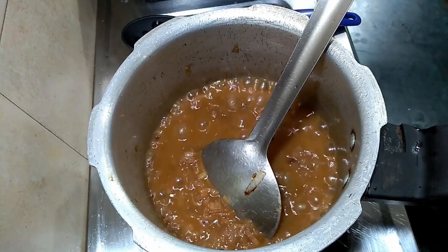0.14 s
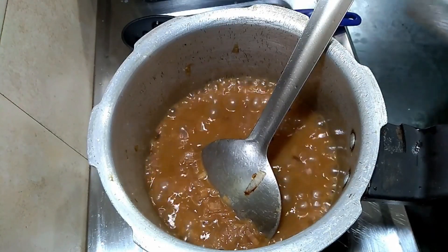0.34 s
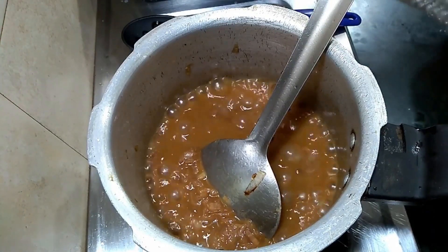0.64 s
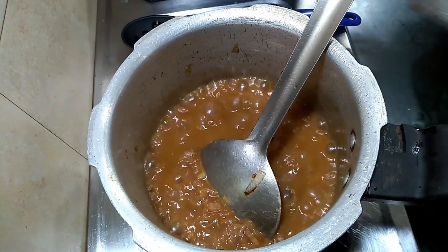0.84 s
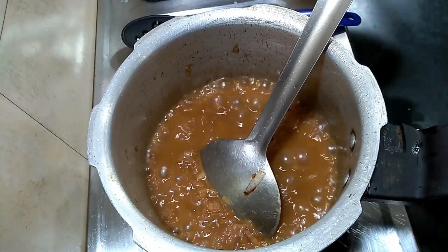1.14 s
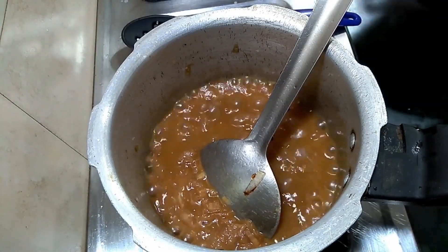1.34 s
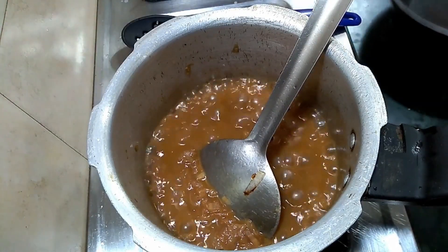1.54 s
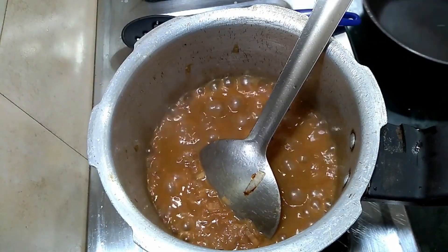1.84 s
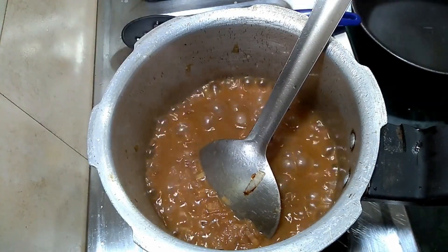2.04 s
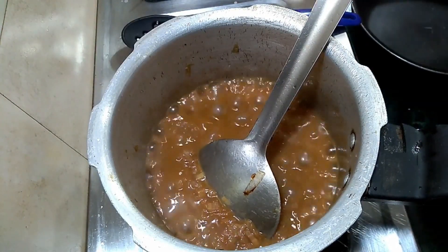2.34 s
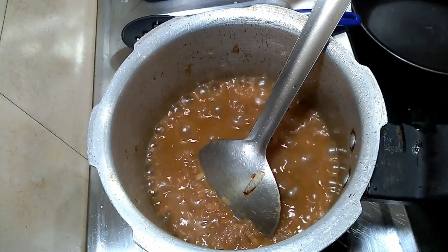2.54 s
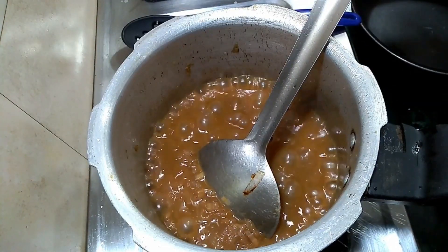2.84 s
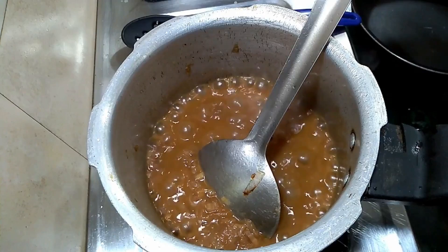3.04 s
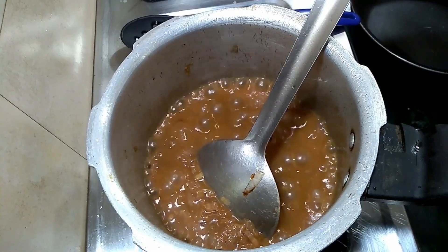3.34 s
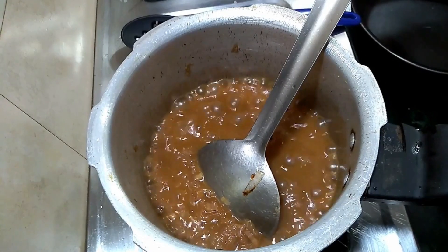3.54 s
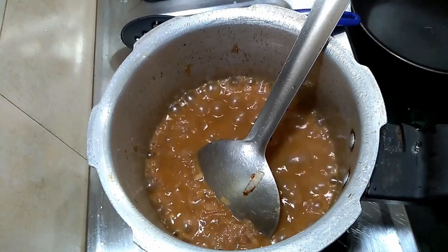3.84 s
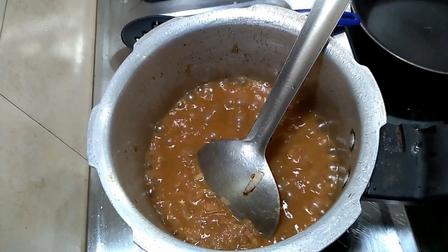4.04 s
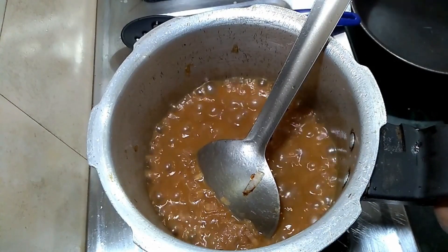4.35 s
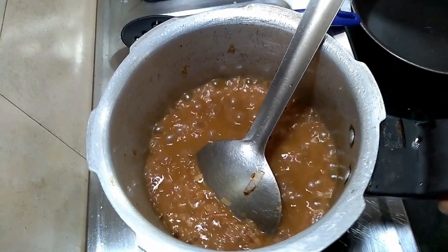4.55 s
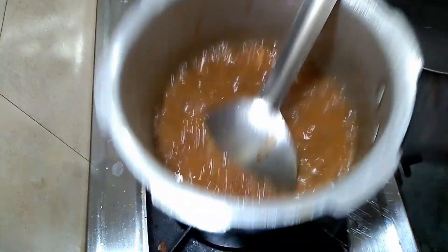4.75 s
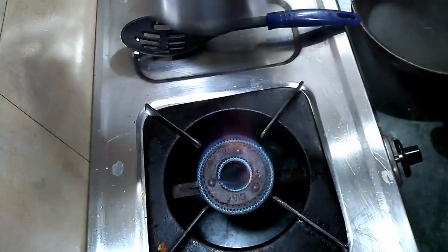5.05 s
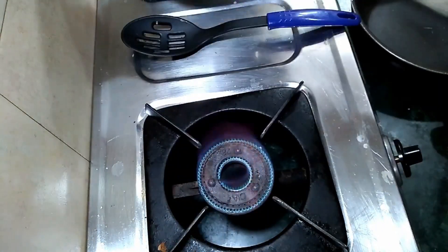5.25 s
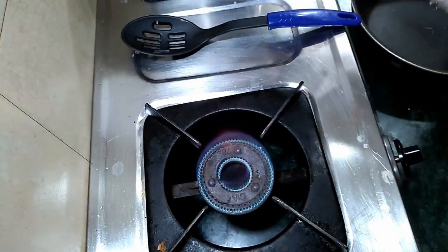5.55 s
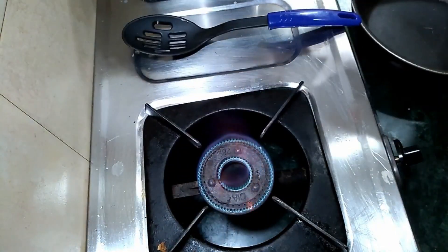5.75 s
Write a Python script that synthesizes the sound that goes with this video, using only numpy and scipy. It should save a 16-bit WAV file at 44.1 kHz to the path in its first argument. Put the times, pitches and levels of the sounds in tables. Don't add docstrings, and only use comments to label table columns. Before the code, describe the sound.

Close to a phone in a small hard-walled kitchen, thin sauce boils vigorously in an open metal pot: dense bright snapping, hollow bubbling and sharp pops. A pan scrapes, then drops with a very loud ringing clank; bowl, spoon and tongs clack softly later. Strong pops come past four seconds, then the pot is lifted, its boil fading quickly, and set down in a run of rattling metallic clanks.

```python
import sys
import numpy as np
from scipy import signal
from scipy.io import wavfile
from scipy.ndimage import uniform_filter1d

SR = 44100
rng = np.random.default_rng(int(sys.argv[2]) if len(sys.argv) > 2 else 0)


def to_wav(s):
    ch = np.atleast_2d(s).T
    pcm = np.round(np.clip(ch, -1, 1) * 32767)
    wavfile.write(sys.argv[1], SR, pcm.astype(np.int16))


def volts_from_db(level):
    exponent = np.asarray(level, float) / 20
    return 10 ** exponent


N = 259528

# time_s, distance_m to the phone
CARRY = [
    (4.84, 0.32),
    (4.9, 0.41),
    (4.98, 0.58),
    (5.25, 0.64),
    (5.45, 1.95),
    (5.88, 0.47),
]


def rms_one(x):
    return x / np.sqrt(np.mean(x ** 2) + 1e-20)


def in_time(rows):
    s, *columns = np.transpose(rows)
    return [np.interp(np.arange(N) / SR, s, c) for c in columns]


def drift(rate):
    r = np.exp(-80 * np.pi * rate / SR)
    white = rng.standard_normal(N // 40 + 2002)
    slow = signal.lfilter([1], [1, -2 * r, r * r], white)[2000:]
    return np.interp(np.arange(N) / 40, np.arange(len(slow)), rms_one(slow))


def swells(rows):
    t = np.arange(N) / SR
    return sum(db * np.exp(-((t - s) / half_s) ** 2) for s, half_s, db in rows)


def band(x, low_hz, high_hz):
    return signal.sosfilt(signal.butter(2, [low_hz, high_hz], "band", fs=SR, output="sos"), x)


def low_pass(x, hz):
    return signal.sosfilt(signal.butter(6, hz, fs=SR, output="sos"), x)


def resonance(x, hz, width):
    r = np.exp(-np.pi * max(width, 2) / SR)
    poles = [1, -2 * r * np.cos(2 * np.pi * hz / SR), r * r]
    return signal.lfilter(np.array([1, 0, -1]) * (1 - r * r) / 2, poles, x)


def grains(per_s, spread_db, clump_db):
    sizes = volts_from_db(spread_db * np.minimum(rng.exponential(1, N), 4)) * rng.choice([-1, 1], N)
    return sizes * (rng.random(N) < per_s * volts_from_db(clump_db * drift(20)) / SR) + 1e-18


def coloured(draw, spectrum, step, patchy_db, rate):
    hz, level_db = np.transpose(spectrum)
    edges = hz[0] * 2 ** np.arange(0, np.log2(hz[-1] / hz[0]), step)
    out = 0
    for k, (low, high) in enumerate(zip(edges, edges[1:])):
        gain_db = np.interp(np.log(low * high) / 2, np.log(hz), level_db)
        out = out + volts_from_db(gain_db + patchy_db * drift(rate)) * band(draw[k % len(draw)], low, high)
    return rms_one(out)


def struck(rows, rise_s):
    out = np.zeros(N)
    for s, peak_db, hz, t60 in rows:
        i = round(s * SR)
        t = np.arange(min(N - i, int(t60 * SR) + 9)) / SR
        envelope = volts_from_db(peak_db - 60 * t / t60) * (1 - np.exp(-t / rise_s))
        out[i:i + len(t)] += envelope * np.sin(2 * np.pi * hz * t)
    return out


def layer_levels():
    # time_s, level_db about its mean
    vigour = [(0, 1), (.3, -1.5), (.57, 0), (1.0, 0.5), (1.4, 0), (1.8, 0), (2.0, 1), (2.3, -2.5),
              (2.55, 0.5), (2.8, -1), (3.2, 0), (3.4, -0.5), (3.8, 0), (4.0, -0.5), (4.2, 1.5), (4.4, 0),
              (4.65, 3), (4.85, 0)]
    # level_db, share of the vigour, share of the distance loss
    layers = [(-31, 0.82, 1.1), (-38.5, 1.14, 2.07), (-36, 0.28, 0.99), (-73.5, 1.5, 0.78)]
    vigour_db, = in_time(vigour)
    metres, = in_time(CARRY)
    loss_db = 20 * np.log10(metres / metres[0])
    return [db + share * vigour_db - far * loss_db for db, share, far in layers]


def sizzle(bright_db, body_db, top_db):
    # freq_hz, level_db per Hz
    body_spectrum = [(1470, -49), (2500, 19.5), (2820, -3), (3020, 5), (3700, -4.5), (4120, 36),
                     (4410, 8.5), (5020, -26), (5410, 10.5), (7000, 15), (9100, -52), (15400, -120)]
    # freq_hz, width_hz, level_db
    snap_bands = [(6940, 1400, -2), (7800, 980, 0), (8730, 250, 4.5), (9500, 1080, 3), (10250, 700, -3.5)]
    # centre_s, half_length_s, rise_db
    steam_surges = [
        (3.62, .05, 9),
        (3.88, .03, 7),
        (4.17, 0.12, 13),
        (4.74, 0.12, 21.5),
    ]
    top_spectrum = [(11000, 5), (12200, 1.5), (13000, -3.5), (16200, -7)]  # freq_hz, level_db

    metres, = in_time(CARRY)
    crisp = (metres[0] / metres) ** 0.69
    snaps = rms_one(grains(per_s=1300, spread_db=3.8, clump_db=3))
    spray = rng.standard_normal((2, N))
    draw = crisp * snaps + np.sqrt(volts_from_db(-18.5) + 1 - np.minimum(crisp, 1) ** 2) * spray
    body = low_pass(coloured(draw, body_spectrum, 1 / 4, patchy_db=3.0, rate=130), 7100)
    bright = 0
    for k, (hz, width, db) in enumerate(snap_bands):
        bright = bright + volts_from_db(db + drift(66)) * band(draw[k % 2], hz - width / 2, hz + width / 2)
    bright = low_pass(bright, 11200)
    mist = spray + volts_from_db(-4) * crisp * snaps
    top = coloured(mist, top_spectrum, 1 / 12, patchy_db=4.5, rate=30)
    top_db = top_db + swells(steam_surges)
    return volts_from_db(bright_db) * rms_one(bright) + volts_from_db(top_db + 16.0) * top + volts_from_db(body_db + 3.0) * rms_one(body)


def standing_waves(modes):
    out = 0
    for hz, width, db in modes:
        bursts = rms_one(grains(per_s=150, spread_db=2.5, clump_db=3.5)) + volts_from_db(-1.0) * rng.standard_normal(N)
        ringing = resonance(resonance(bursts, hz, 3.4 * width), hz, 0.85 * width)
        out = out + volts_from_db(db + 2.0 * drift(1.96)) * rms_one(ringing)
    return rms_one(out)


def air_column(wave_db, body_db):
    # freq_hz, width_hz, level_db
    main_wave = [(1590, 566, 0)]
    # freq_hz, width_hz, level_db
    other_waves = [(900, 715, 18.5), (1090, 200, 4), (2446, 230, 10), (3434, 110, 2), (4164, 290, 8),
                   (4930, 1140, 15)]
    main = volts_from_db(wave_db) * band(standing_waves(main_wave), 1190, 1977)
    return main + volts_from_db(body_db + 3.5) * standing_waves(other_waves)


def pops():
    # start_s, peak_db, pitch_hz
    large_pops = [(.1453, -4, 9300), (.2197, -4, 9300), (.247, -3.5, 9300), (.3252, 9, 8300),
                  (.5195, -14.5, 6340), (.631, -2.5, 8850), (.7272, -4, 8300), (1.074, -7, 9300),
                  (1.1396, -8, 7800), (1.2146, -1.5, 8550), (1.369, -3.5, 7800), (1.6731, 2.5, 10000),
                  (2.0104, -8, 9300), (2.517, -8, 9800), (2.7886, -7, 8400), (2.9316, -5.5, 8500),
                  (3.1937, 0, 8700), (3.316, -5, 9500), (3.3568, -3, 9100), (3.6109, -8, 5450),
                  (3.6447, -8, 8000), (3.8137, -6.5, 9500), (3.9828, -10.5, 8250), (4.0711, -0.5, 9000),
                  (4.0941, -14, 9370), (4.1094, 17, 10100), (4.1447, 25, 9300), (4.173, 4, 8000),
                  (4.364, -0.5, 10000), (4.7116, 2, 10400)]
    # start_s, peak_db, pitch_hz
    lesser_pops = [(0.1679, -17.5, 7620), (0.2525, -25, 9340), (0.314, -11, 8280), (0.3621, -15, 9620),
                   (0.377, -21.5, 5770), (0.391, -13, 8590), (0.4574, -13, 8380), (1.0864, -23, 8600),
                   (1.1164, -23, 9930), (1.254, -13, 9090), (1.304, -20, 8200), (1.3452, -23, 9390),
                   (1.415, -22, 8590), (1.514, -20.5, 5070), (1.5264, -13, 7180), (1.882, -16, 8610),
                   (1.9853, -20.5, 5250), (2.0895, -25, 8500), (2.1359, -33, 8040), (2.157, -23, 8220),
                   (2.3165, -27, 8610), (2.422, -13.5, 8660), (2.988, -22.5, 4150), (3.438, -32, 8130),
                   (3.469, -19, 9360), (3.5183, -11, 8570), (3.5817, -26, 7130), (3.651, -9.5, 8060),
                   (3.705, -9, 8600), (3.7484, -12.5, 8610), (3.873, -14, 9020), (3.8799, -7, 9080),
                   (3.9259, -21, 10200), (3.9436, -17, 8530), (3.95, -16, 8230), (4.2848, -9, 9610),
                   (4.348, -17, 9470), (4.3776, -22.5, 3980), (4.4796, -31, 8610), (4.557, -17, 4240),
                   (4.5764, -7, 9100), (4.6364, -15, 9210), (4.76, -14.5, 9050), (4.791, -7.5, 9840)]

    count = int(60 * 4.8)
    when, size = rng.random(count), rng.standard_normal((count, 2))
    small_hz = np.minimum(8300 * 2 ** (-0.35 * size[:, 1]), 11000)
    small_db = -22 + 2.5 * np.minimum(size[:, 0], 1.3)
    small = np.c_[when * CARRY[0][0], small_db, small_hz]

    listed = np.array([*large_pops, *(np.array(lesser_pops) + [0, 8, 0])])
    drops = []
    for (s, db, hz), row in zip(listed, rng.random((len(listed), 3, 3))):
        for late, weak, low in row:
            drops.append((s + 0.0051 * late, min(db, -4) - 9 - 6 * weak, hz * (1.1 - .6 * low)))
    direct = struck([(s, db + 4, hz, 10 / hz) for s, db, hz in [*listed, *drops, *small]], rise_s=.0001)

    t = np.arange(int(.02 * SR)) / SR
    wall = band(rng.standard_normal(len(t)), 4000, 11000) * volts_from_db(-25 - 2500 * t)
    return low_pass(direct + signal.fftconvolve(direct, wall)[:N], 11200)


def blips():
    # start_s, peak_db, pitch_hz
    pockets = [(0.222, -20.5, 1550), (0.609, -35, 1690), (1.07, -24, 1710), (1.2779, -19, 2470),
               (1.414, -22, 1610), (1.928, -29, 1740), (2.1102, -24, 1610), (2.175, -24.5, 1096),
               (2.2255, -24, 1630), (2.316, -31, 1590), (2.369, -25, 1640), (2.744, -23, 1520),
               (2.8932, -26, 1570), (3.1536, -23, 1610), (3.641, -24, 1580), (4.5416, -23.5, 1610),
               (4.5922, -19, 1710), (4.764, -21.5, 1540), (5.1816, -36, 1456), (5.2897, -26, 1477)]
    # start_s, peak_db, pitch_hz
    gulp = (1.428, -21, 1200)
    chance = rng.random((70, 3))
    stray = np.c_[chance[:, 0] * CARRY[0][0], -35 + 7 * chance[:, 1], 700 * 3 ** chance[:, 2]]
    out = np.zeros(N)
    for rows, cycles, rise in ((pockets, 48, .08), ([*stray, gulp], 30, .25)):
        for s, db, hz in rows:
            i, t60 = round(s * SR), cycles / hz
            t = np.arange(int(t60 * SR)) / SR
            phase = 2 * np.pi * hz * (t - rise * t / 4 + rise * t ** 2 / t60)
            envelope = volts_from_db(db + 3.5 - 60 * t / t60) * (1 - np.exp(-t / 0.0017))
            out[i:i + len(t)] += envelope * np.sin(phase)
    return out


def band_bursts():
    # start_s, rms_db, centre_hz, width_hz, t60_s
    puffs = [(5.045, -31, 8000, 2520, 0.25), (5.079, -36, 4200, 2200, 0.36), (5.098, -34, 9300, 1760, 0.71),
             (5.148, -39.5, 4000, 2400, 0.67), (5.173, -30, 7800, 3040, 0.29),
             (5.325, -38.5, 4990, 900, 0.28), (5.324, -34, 8440, 1490, 0.17), (4.72, -39, 3430, 159, 0.46),
             (4.87, -44.5, 3390, 160, .4), (4.9, -49, 4130, 151, .4), (5.021, -46.5, 2750, 130, 0.48),
             (5.16, -47, 2730, 150, .3), (5.272, -40.5, 1170, 300, .6), (5.335, -48, 3680, 100, .2),
             (5.378, -48.5, 2340, 90, 0.45), (5.4, -49, 2900, 90, .15), (5.625, -30, 1700, 1300, .3),
             (5.63, -33, 6700, 3600, .25), (5.745, -33, 6500, 4000, .2), (5.815, -33, 8800, 1800, .05)]
    out = np.zeros(N)
    for s, db, hz, width, t60 in puffs:
        i = round(s * SR)
        t = np.arange(min(N - i, int(t60 * SR))) / SR
        puff = rms_one(band(rng.standard_normal(SR)[:len(t)], hz - width / 2, hz + width / 2))
        out[i:i + len(t)] += volts_from_db(db - 60 * t / t60) * puff
    return out


def knocks(rows, body, crack_db, upper_db, upper_share, top_db):
    # low_hz, high_hz
    edges_hz = [(5000, 11500), (140, 600), (600, 2000), (2000, 5000), (11500, 15600)]
    rises = [0.000065, 0.0014, 0.0008, 0.00099, 0.00043]
    out = np.zeros(N)
    near = slice(int(rows[0][0] * SR) - 2000, int((rows[-1][0] + 1) * SR))
    for k, (low, high) in enumerate(edges_hz):
        power = np.zeros(N)
        for s, db, hard_db, weight_db, t60 in rows:
            tilt_db = [hard_db, weight_db, 0, upper_db + upper_share * hard_db, top_db + hard_db][k]
            i, t60 = round(s * SR), max(t60, .02)
            t = np.arange(min(N - i, int(1.2 * t60 * SR))) / SR
            shape = (volts_from_db(-60 * t / t60) + volts_from_db(crack_db - 19000 * t)) * (1 - np.exp(-t / rises[k]))
            power[i:i + len(t)] += (volts_from_db(db + tilt_db - 6.5) * shape) ** 2
        noise = low_pass(band(rng.standard_normal(N)[near], low, high), high)
        out[near] += np.sqrt(power[near]) * rms_one(noise)
    out += 1e-18
    return out + sum(volts_from_db(db) * resonance(out, hz, width) for hz, width, db in body)


def pan():
    # start_s, strength_db, hardness_db, weight_db, t60_s
    slide_knocks = [
        (.7553, -29.5, 6, 0, 0.075),
        (.8092, -16.5, -6.5, -11.5, 0.24),
        (.8607, -21.5, -5, -21, 0.35),
        (.8824, -24, 9.5, -18, 0.18),
        (.904, -31, -13, -4, .084),
        (.93, -17, -6.5, -10.5, 0.32),
        (.9474, -21.5, -9, 2, 0.16),
        (.9675, -31, 13, -8, 0.045),
    ]
    drop_knocks = [
        (1.5853, 5.5, -6.5, -7.5, 0.19),
        (1.6094, -33, -15, 13, 0.3),
        (1.6444, -2.5, -28, 0.5, 0.058),
        (1.6638, -35, 7.5, 11.5, 0.41),
    ]
    # freq_hz, width_hz, level_db
    sliding_modes = [(358, 130, 14.5), (827, 22, 17), (915, 49, 7.8), (1300, 15, 13), (1460, 14, 2.1),
                     (1920, 48, 1.8), (2350, 48, 9.6), (3010, 17, 1.8), (3610, 23, 3.7)]
    dropped_modes = [(572, 30, 4), (740, 40, 8), (760, 16, 15), (1141, 30, 7), (1240, 30, 3), (1467, 25, 8),
                     (2400, 60, 5), (2950, 50, 4), (3575, 40, 3), (5190, 60, 4), (5998, 40, 6),
                     (6340, 30, 8), (8452, 60, 4)]
    slide = knocks(slide_knocks, sliding_modes, crack_db=-32, upper_db=0.5, upper_share=0.66, top_db=-38)
    drop = knocks(drop_knocks, dropped_modes, crack_db=-6, upper_db=-2.5, upper_share=1.0, top_db=-24)
    return slide + drop


def pot_and_tongs():
    # start_s, strength_db, hardness_db, weight_db, t60_s
    pot_knocks = [
        (5.4709, -12.5, 6, -7.5, 0.21),
        (5.4824, -6.5, 0.8, -2.5, 0.16),
        (5.5162, -9.5, 3.5, 3, 0.18),
        (5.549, -14, -4, -1.5, 0.25),
        (5.5874, -17.5, -2, -2, 0.19),
        (5.6, -29.5, 6, -15, 0.44),
        (5.63, -34, 5.5, -13, 0.4),
        (5.693, -19.5, -12, -0.5, 0.15),
        (5.73, -17, 4, -2, 0.15),
        (5.7945, -24, 0.5, -7, 0.22),
    ]
    tongs_knocks = [
        (3.0312, -16, 13.5, 6, 0.065),
        (3.0426, -19, 2.7, 0.92, 0.25),
    ]
    # freq_hz, width_hz, level_db
    pot_modes = [(294, 30, 9), (386, 30, 6), (495, 35, 4), (820, 45, 7), (2700, 300, 1), (3465, 50, 6),
                 (3595, 50, 5), (3796, 60, 5), (4274, 60, 3), (7887, 140, 2), (8716, 120, 3), (9500, 80, 5)]
    tongs_modes = [(796, 150, 3), (1150, 53, 5), (1300, 49, 4.2), (3830, 420, 5), (9500, 3700, 9.9),
                   (13330, 53, 5.8)]
    landing = knocks(pot_knocks, pot_modes, crack_db=-14.0, upper_db=0.4, upper_share=0.11, top_db=-17.0)
    clack = knocks(tongs_knocks, tongs_modes, crack_db=-21.0, upper_db=-3, upper_share=0.94, top_db=-0.7)
    return landing + clack


def spoon_and_bowl():
    # start_s, strength_db,
    # hardness_db, weight_db, t60_s
    spoon_knocks = [
        (.516, -46.5, 22, -3, 0.21),
        (2.516, -41, 12, -11, 0.13),
        (3.814, -42, 17, -9, 0.078),
        (4.011, -23, -2.5, 1.5, 0.14),
        (4.0958, -13.5, -2, -5.5, 0.1),
        (4.1262, -17, 9, 2, 0.25),
    ]
    bowl_knocks = [(1.7474, -37, -22, 3, 0.38), (1.8028, -23.5, -16, -1.5, 0.084),
                   (2.4153, -52, 13.5, 15, 0.4), (2.4594, -42, -36, 8, 0.32), (2.5794, -23, 4.5, -4, 0.11),
                   (2.6065, -21, 4, 6.5, 0.12), (2.63, -35, 12.5, 8.5, 0.3), (3.1931, -39, 14, 8, 0.13),
                   (3.2214, -28, 1, -1.5, 0.11), (3.2506, -31.5, 3.5, 7.5, 0.2),
                   (3.9833, -25.5, 2, -0.5, 0.051), (4.3835, -41.5, 7, 17, 0.13),
                   (4.4984, -21.5, -13, 0, 0.059), (4.5194, -42.5, 6, 13.5, 0.22)]
    # freq_hz, width_hz, level_db
    spoon_modes = [(2200, 110, 1.7), (5570, 370, 1.7), (9300, 1900, 5.9)]
    bowl_modes = [(230, 150, 1), (339, 99, 6.2), (513, 73, 11.3), (720, 46, 19.5), (830, 9.8, 1),
                  (2060, 59, 8.7)]
    spoon = knocks(spoon_knocks, spoon_modes, crack_db=10.5, upper_db=0.0, upper_share=0.69, top_db=-9.5)
    bowl = knocks(bowl_knocks, bowl_modes, crack_db=-12, upper_db=-2, upper_share=1.0, top_db=-43)
    return spoon + bowl


def low_rings():
    # start_s, peak_db, pitch_hz, t60_s
    clean_rings = [(.752, -20, 843, 0.42), (1.589, -1, 1460, 0.072), (1.586, 1, 2340, 0.093),
                   (1.591, -4.5, 1125, 0.18), (1.803, -30, 696, 0.086), (1.803, -17.5, 1664, 0.032),
                   (5.482, -13, 819, 0.38), (5.517, -9.5, 294.7, 0.28), (5.517, -14.5, 389, 0.19),
                   (5.517, -6, 775, 0.13), (5.52, -16, 3593, 0.28), (5.52, -14.5, 3798, 0.25),
                   (5.59, -16.5, 504, 0.18),
                   (1.586, 9, 760, .24),
    ]
    return struck(clean_rings, rise_s=0.001)


def rattling_rings():
    # start_s, peak_db, pitch_hz, t60_s
    upper_modes = [(1.586, -8, 6347, 0.23), (1.602, -22, 6347, 0.22), (1.586, -8, 7830, .04),
                   (1.604, -17, 8463, .15), (1.612, -13, 5290, 0.16), (1.622, -12.5, 5160, 0.063),
                   (1.6, -20, 3970, 0.21), (1.588, 0, 565, 0.14), (1.63, -22, 2350, 0.21),
                   (5.4715, -12, 2990, 0.035), (5.4715, -12.5, 4260, 0.034), (5.4873, -9.5, 3730, 0.088),
                   (5.59, -26.5, 9360, 0.13), (5.597, -18, 3800, 0.095), (5.6938, -22.5, 4690, 0.053),
                   (5.7292, -14, 9400, .04), (5.7292, -16, 3800, .1), (5.7956, -31, 2900, 0.1),
                   (5.7956, -27.5, 5640, 0.07)]
    pan_rebound = [(1.641, 14, 760, .065)]  # start_s, peak_db, pitch_hz, t60_s
    rings = struck(upper_modes, rise_s=.0005) + struck(pan_rebound, rise_s=.012)
    return rings * volts_from_db(3 * drift(120))


def counter():
    # start_s, peak_db, t60_s
    thuds = [
        (0.951, -62, 0.64),
        (1.599, -22.5, 0.65),
        (2.619, -32, 0.62),
        (3.052, -32, 0.79),
        (3.217, -19, 0.61),
        (3.252, -34, 0.54),
        (5.479, -36, 0.25),
        (5.597, -34, 0.52),
    ]
    # start_s, peak_db, pitch_hz, t60_s
    taps = [
        (1.424, -23, 905, 0.069),
        (1.971, -22.5, 162, 0.087),
        (1.999, -23.5, 144, 0.19),
        (2.459, -29, 496, 0.11),
        (3.109, -22, 155, 0.089),
        (3.224, -15, 203, 0.071),
        (3.255, -19.5, 220, 0.06),
        (4.726, -24, 152, 0.075),
        (5.117, -26.5, 760, 0.19),
        (5.194, -15.5, 714, 0.037),
    ]
    # start_s, peak_db, pitch_hz, t60_s
    jolts = [
        (1.587, -7, 34, 0.055),
        (3.031, -38, 44.7, 0.11),
        (5.476, -33, 40, 0.17),
    ]
    booms = struck([(s, db, 97.9, t60) for s, db, t60 in thuds], rise_s=0.0059)
    return booms + struck(taps + jolts, rise_s=0.001)


def churn():
    # freq_hz, level_db per Hz
    rumble_spectrum = [(15, -76.5), (25, -40), (59, -25.5), (81, -18), (135, -6.5), (179, -30), (198, -22),
                       (416, -12), (656, -13.5), (874, -9), (950, -8.5), (1400, -4.5), (1820, -15),
                       (3080, -120)]
    # centre_s, half_length_s, rise_db
    shakes = [
        (.87, 0.13, 4),
        (1.74, 0.13, 7),
        (2.1, 0.12, 1),
        (3.1, 0.28, 3.5),
        (4.5, 0.26, 3.5),
        (5.65, 0.1, 6),
    ]
    rumble = coloured(rng.standard_normal((2, N)), rumble_spectrum, 1 / 2, patchy_db=3.0, rate=18.3)
    return low_pass(low_pass(rumble, 892), 892) * volts_from_db(-31 + swells(shakes))


def thin_tones():
    # freq_hz, width_hz, rms_db
    whistles = [(1484, 180, -45.5), (1640, 20, -51.5), (2466, 100, -56), (2660, 260, -63), (4200, 50, -69),
                (5370, 90, -89), (8000, 83, -53.5)]
    white = rng.standard_normal(N)
    out = 0
    for hz, width, db in whistles:
        out = out + volts_from_db(db + 3 * drift(6.5)) * rms_one(resonance(resonance(white, hz, width), hz, width))
    return out


def room(x):
    level_db, t60_s = -21, 0.35
    t = np.arange(int(.5 * SR)) / SR
    tail = band(rng.standard_normal(len(t)), 710, 8000) * volts_from_db(-60 * t / t60_s) * (t > .008)
    return x + volts_from_db(level_db) * signal.fftconvolve(x, tail / np.sqrt(np.sum(tail ** 2)))[:N]


def scene():
    bright_db, body_db, wave_db, top_db = layer_levels()
    boil = sizzle(bright_db, body_db, top_db) + air_column(wave_db, body_db) + pops() + blips() + band_bursts()
    cookware = room(pan() + pot_and_tongs() + rattling_rings()) + spoon_and_bowl() + low_rings()
    return (boil + cookware + counter() + churn() + thin_tones())[None]


def denoise(x, depth_db, strength):
    hz, _, spec = signal.stft(x, SR, nperseg=1024, noverlap=768)
    power = uniform_filter1d(np.abs(spec) ** 2, size=7, axis=-1)
    power = uniform_filter1d(power, size=2, axis=-2) + 1e-20
    steady = uniform_filter1d(np.median(power, axis=-1, keepdims=True), size=15, axis=-2)
    steady = steady * np.interp(hz, [500, 1200, 11000, 12000], [0, 1, 1, .6])[:, None]
    gain = np.sqrt(np.clip(1 - strength * steady / power, volts_from_db(2 * depth_db), 1))
    return signal.istft(spec * gain, nperseg=1024, noverlap=768)[1][..., :N]


def top_cut(x):
    return signal.sosfilt(signal.butter(12, 15650, fs=SR, output="sos"), x)


def record(dry):
    clipped = np.clip(denoise(dry, depth_db=-17, strength=.6), -.99, .99)
    cut = signal.sosfilt(signal.cheby2(10, 30, 16000, fs=SR, output="sos"), clipped)
    return top_cut(cut)


dry = scene()
out = record(dry)
to_wav(out)
```